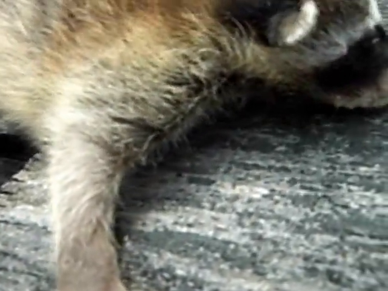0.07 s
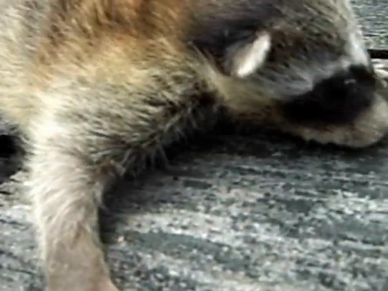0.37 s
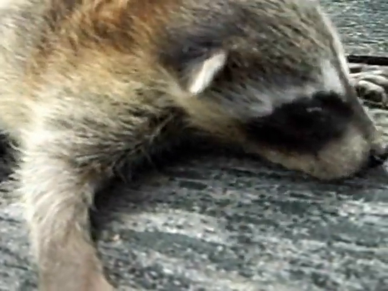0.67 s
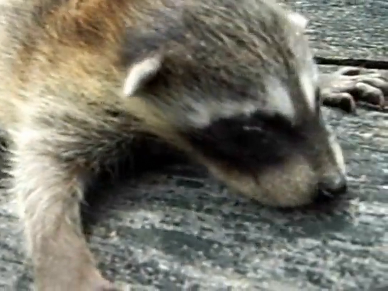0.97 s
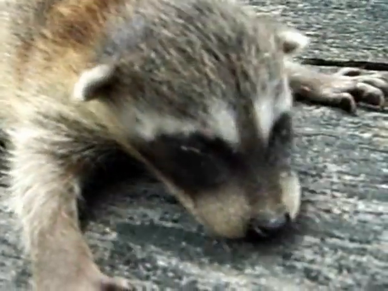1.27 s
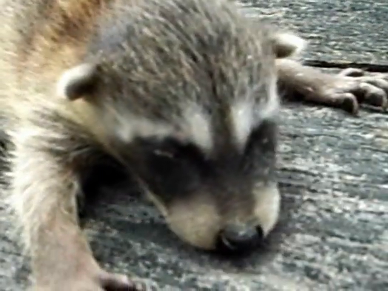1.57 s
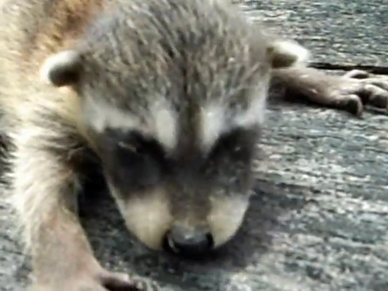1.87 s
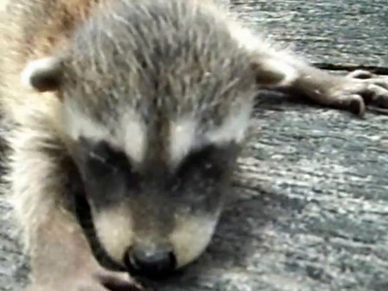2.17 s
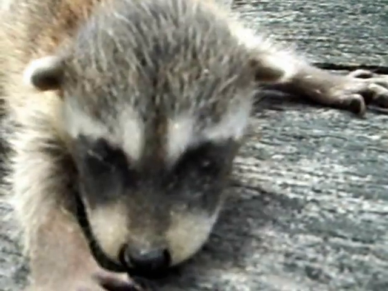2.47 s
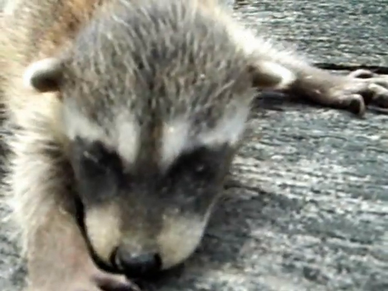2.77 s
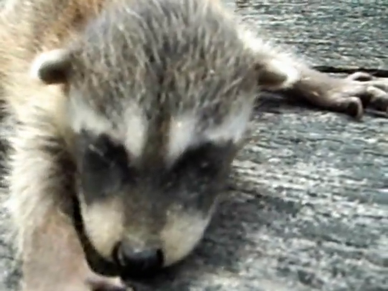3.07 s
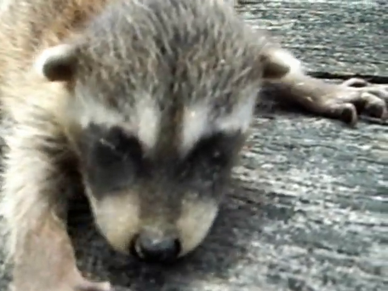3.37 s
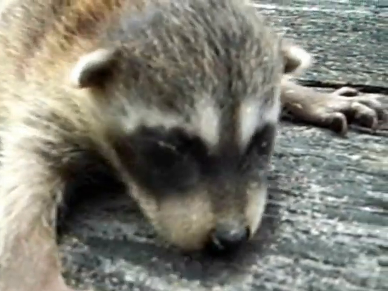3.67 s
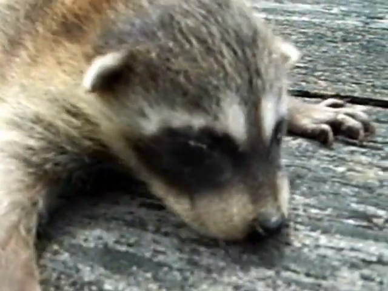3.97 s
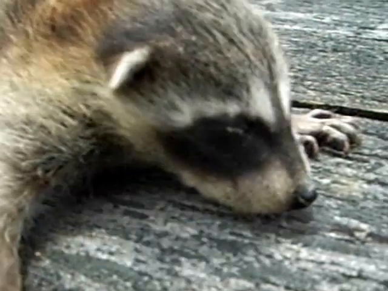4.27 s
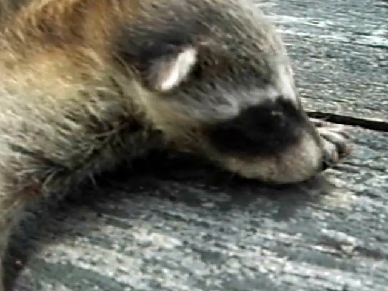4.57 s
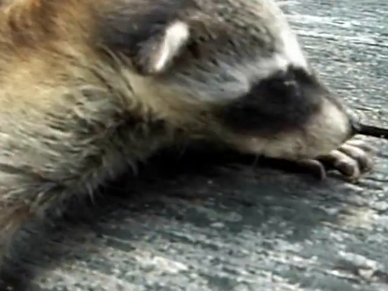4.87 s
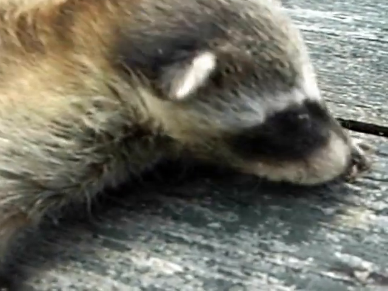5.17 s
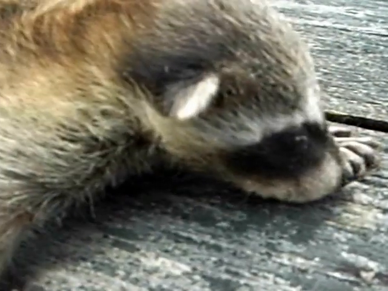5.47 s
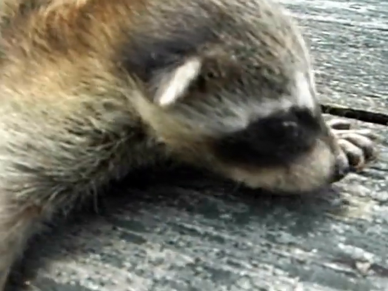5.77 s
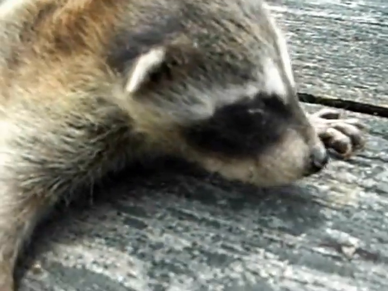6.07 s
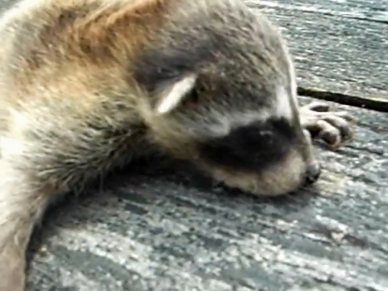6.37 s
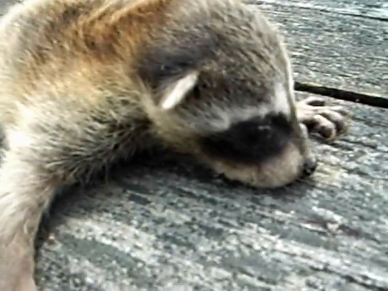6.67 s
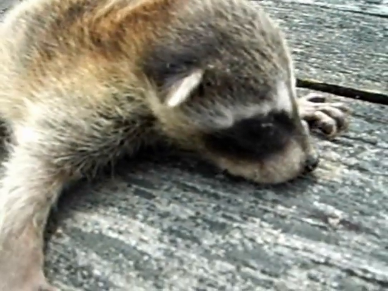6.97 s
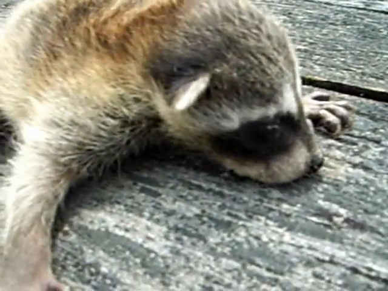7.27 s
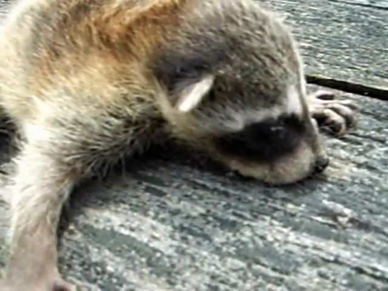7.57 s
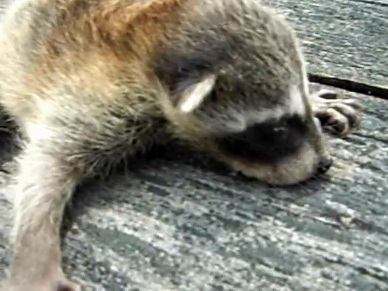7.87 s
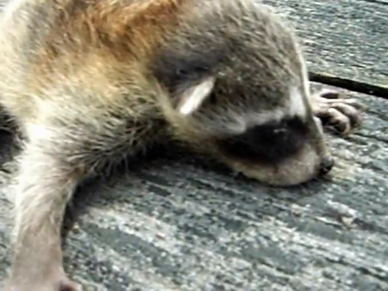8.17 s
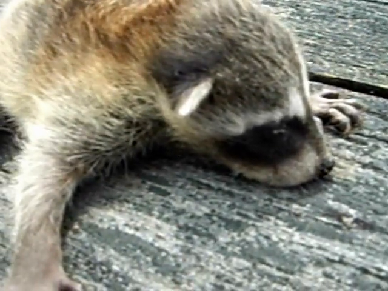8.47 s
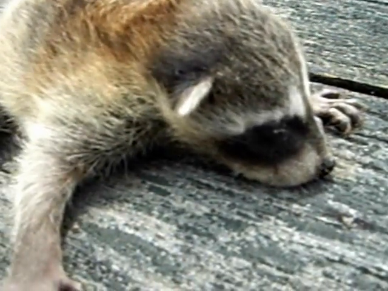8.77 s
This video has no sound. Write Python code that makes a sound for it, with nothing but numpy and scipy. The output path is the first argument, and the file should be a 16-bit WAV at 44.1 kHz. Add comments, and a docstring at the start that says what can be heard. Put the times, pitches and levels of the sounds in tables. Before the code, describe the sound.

Outdoors, distant traffic hums and rumbles quietly while a baby raccoon calls close by. It gives a short burst of raspy chitters, a couple of tiny coos and a rising whistle, then four more rapid chittering bouts, ending with the loudest. A far vehicle passes during the later bouts. The animal then falls silent, leaving the engine drone, soft tyre hiss and a very faint high whine.

```python
"""Baby raccoon chittering outdoors

A baby raccoon on wooden boards, close by, chitters in five bouts. Each chit is a short rasp of uneven
throat pulses, coloured by the opening mouth. Thin coos lead into the bouts; one rises to a whistle.
Far engines drone over a low rumble and tyre hiss, one of them passing by. A camera whines faintly."""
import sys
import numpy as np
from scipy import signal
from scipy.fft import rfft, irfft
from scipy.io import wavfile
from scipy.ndimage import uniform_filter1d

SR = 44100
rng = np.random.default_rng(int(sys.argv[2]) if len(sys.argv) > 2 else 0)


def int16_out(signal):
    """Quantize to a 16-bit WAV file."""
    q = np.round(np.clip(np.atleast_2d(signal).T, -1, 1) * 32767)
    wavfile.write(sys.argv[1], SR, q.astype(np.int16))


N = 397782
TIME_S = np.arange(N) / SR

# Far engine partials. Each row: multiple of the firing rate, offset from the swell in dB, trend in dB/s.
DRONE_PARTIALS = [(1, -7.5, -0.03), (2, 1, -0.28), (3, -5.5, 0.72), (4, -8.5, -0.4), (5, -14, 0.34),
                  (6, -17.5, -0.07)]
# Its swell on the moving air. Each row: time in seconds, level in dB.
DRONE_SWELL = [(0.0, -44.5), (2.41, -53), (2.99, -41.5), (4.7, -54.5), (5.9, -47), (9.02, -48)]
# Second far engine. Each row: time in seconds, pitch in Hz, level in dB.
ENGINE_HUM = [(0, 114.4, -55), (3, 113, -48.5), (9.02, 103.8, -66)]
# Outdoor rumble. Each row: frequency in Hz, relative density in dB.
RUMBLE_SPECTRUM = [(15, -40), (40, -1), (120, -4), (250, 4.5), (450, -6.5), (750, 0), (1100, -10.5),
                   (1900, -19.5), (2900, -32), (7000, -38), (10000, -44), (14000, -60)]
# Tyres on a far road. Each row: frequency in Hz, relative density in dB.
TYRE_SPECTRUM = [(300, -19), (1050, 4.5), (1350, -7), (1650, -4.5), (1950, -19.5), (2800, -23.5),
                 (4100, -23), (7000, -44), (14000, -77)]
# Camera whine. Each row: frequency in Hz, level in dB.
WHINE_TONES = [(7418, -68), (9868, -85)]
# Coos. Each row: start in seconds, length in seconds, mid pitch in Hz, glide in octaves/s, level in dB.
COOS = [(0.087, 0.047, 629, -4, -33), (0.16, 0.028, 666, 25, -35), (1.122, .024, 756, 6, -33.5),
        (1.482, 0.0412, 723, -7.5, -30.5), (2.302, 0.073, 758, -0.8, -34.5), (2.471, 0.025, 763, 16, -30),
        (3.139, 0.028, 716, -7.5, -34), (3.164, 0.036, 1053, 16.5, -28), (3.218, .025, 800, 10, -31.5),
        (3.283, 0.0256, 886, 13, -33), (4.174, 0.033, 705, -7.5, -32.5), (5.51, 0.04, 838, -5.5, -29.5)]
# Head response to coo and whistle overtones. Each row: frequency in Hz, gain in dB.
OVERTONE_RESPONSE = [(1300, -1.5), (2100, 12.5), (2900, -4), (3800, -5), (4500, -16), (5800, 16),
                     (6900, 4.5), (9500, 1)]
# Mouth opening, head turning. Each row: time in seconds, resonance in Hz, treble against body in dB.
MOUTH = [(.2, 950, -18.5), (.29, 1420, -9), (.48, 1050, -11.5), (1.16, 770, -37), (2.35, 820, -22),
         (2.55, 1000, -6.5), (3.28, 1140, -1.5), (3.59, 1220, -4), (4.24, 1030, -9), (4.37, 1370, -4.5),
         (5.02, 1560, -13), (5.58, 1310, -9.5), (6.05, 1800, -5)]
# Chits. Each row: peak time in seconds, level in dB, swell in seconds, release in seconds.
CHITS = [(.177, -29.5, 0.021, .005), (.214, -23, .015, 0.024), (0.288, -17, 0.03, 0.0077),
         (.344, -22, 0.029, 0.0035), (0.394, -21.5, .026, 0.0068), (.475, -26, 0.04, 0.0026),
         (1.156, -28, 0.019, 0.012), (2.326, -27.5, .023, .022), (2.366, -27.5, 0.01, .006),
         (2.424, -24.5, 0.017, .016), (2.494, -22, .025, 0.0097), (2.558, -24.5, 0.022, .008),
         (2.614, -21.5, .019, 0.0072), (2.676, -22.5, 0.028, 0.0067), (3.189, -27, .021, 0.014),
         (3.247, -21, .023, .013), (3.305, -18, .019, .013), (3.364, -20, 0.026, 0.0046),
         (3.4, -23, 0.012, 0.019), (3.472, -19.5, .017, .012), (3.585, -21, 0.022, 0.011),
         (4.246, -24.5, 0.032, 0.0068), (4.31, -22, 0.033, 0.0047), (4.365, -20.5, .028, 0.01),
         (4.417, -21, .028, .011), (4.472, -20, .025, 0.0097), (4.528, -21.5, .027, 0.0093),
         (4.594, -22.5, 0.03, 0.0076), (4.656, -24, 0.031, 0.0052), (4.713, -19.5, .029, 0.0041),
         (4.777, -19, .025, .012), (4.838, -25.5, 0.023, .015), (4.905, -22, 0.03, 0.012),
         (4.971, -18.5, 0.025, 0.0078), (5.02, -25, .016, 0.016), (5.577, -19, 0.028, .01),
         (5.633, -15, 0.021, .014), (5.679, -15, 0.025, .012), (5.726, -13.5, 0.021, .012),
         (5.779, -13.5, 0.024, 0.0097), (5.826, -12.5, .018, .013), (5.882, -16.5, .025, .008),
         (5.941, -15.5, 0.024, .013), (6.024, -17, 0.026, 0.0074), (6.107, -19, 0.027, .012)]
# Chit timbre per bout. Each row: start in seconds, nasal dip in Hz, top frequency in Hz, throat modes.
# Each mode: frequency in Hz, width in Hz, gain against the mouth resonance in dB.
BOUT_TIMBRES = [(0, 4280, 6500, [(1810, 680, -16.5), (2980, 450, -13.5), (4850, 500, -23),
                (6370, 3100, -16)]), (2.2, 1380, 5600, [(1920, 180, -5), (3540, 450, -9), (4500, 400, -18),
                (6300, 4100, -10.5)]), (3, 1436, 7060, [(1940, 560, -5), (3570, 360, -4), (4400, 1100, -16),
                (6200, 1200, -14)]), (4, 2790, 7630, [(1960, 960, -10), (3890, 440, 5), (4660, 540, -1),
                (6100, 1400, -3)]), (5.3, 2516, 8000, [(1570, 340, 0.5), (4020, 880, -3), (6400, 660, -20),
                (8150, 390, -27)])]
# Dry ticks. Each row: start in seconds, relative level in dB.
TICKS = [(.305, -24), (3.333, -22), (3.375, -24), (7.725, -46)]
# Hissy rasps around the bouts. Each row: start in seconds, length in seconds, level in dB.
RASPS = [(0.412, 0.058, -46), (.508, .032, -47.5), (0.54, .033, -46.5), (1.107, .095, -53.5),
         (1.466, .098, -52), (1.947, 0.1, -49.5), (2.294, 0.064, -46.5), (2.717, 0.065, -50),
         (3.504, 0.06, -41.5), (3.626, 0.027, -46), (4.189, 0.032, -51), (5.058, .045, -47.5),
         (5.51, 0.042, -48.5), (5.964, .048, -46), (6.157, 0.039, -44)]
# Rasp and tick noise. Each row: frequency in Hz, relative density in dB.
RASP_SPECTRUM = [(1000, 10), (2600, -3.5), (4300, 0.5), (7000, -4), (9000, -13.5), (14000, -37)]
# Whistle contour. Each row: time in seconds, pitch in Hz, level ahead of the nasal dip in dB.
WHISTLE = [(1.964, 790, -28), (1.99, 664, -31.5), (2.023, 758, -33.5), (2.052, 1105, -28),
           (2.078, 1493, -18.5), (2.092, 1525, -18), (2.112, 1831, -19), (2.143, 1897, -19.5),
           (2.16, 1780, -26)]


def from_db(db):
    return 10 ** (np.asarray(db) / 20)


def curves(rows):
    """Each column after the time column, at every sample."""
    times_s, *columns = np.transpose(rows)
    return [np.interp(TIME_S, times_s, column) for column in columns]


def add(out, start_s, x):
    i = max(int(start_s * SR), 0)
    out[i:i + len(x)] += x[:N - i]


def butter(x, hz, kind, order=4):
    return signal.sosfilt(signal.butter(order, hz, kind, fs=SR, output="sos"), x)


def resonance(x, hz, width_hz):
    """Two-pole band-pass, unity peak gain."""
    r = np.exp(-np.pi * width_hz / SR)
    feedback = [1, -2 * r * np.cos(2 * np.pi * hz / SR), r * r]
    return signal.lfilter(np.array([1, 0, -1]) * (1 - r * r) / 2, feedback, x)


def drift(rate_hz, size=N):
    """Random wander, spread about 1."""
    return np.interp(np.arange(size) * rate_hz / SR, np.arange(20000), rng.standard_normal(20000))


def shaped_noise(spectrum):
    """Steady noise, rms 1."""
    hz, db = np.transpose(spectrum)
    bins_hz = np.arange(N // 2 + 1) * SR / N
    gain = from_db(np.interp(np.log(bins_hz + 1), np.log(hz), db))
    noise = irfft(gain * rfft(rng.standard_normal(N)), N)
    return noise / np.sqrt(np.mean(noise ** 2) + 1e-20)


def tone(hz):
    """Sine on a pitch curve, rms 1."""
    return np.sqrt(2) * np.sin(2 * np.pi * np.cumsum(hz) / SR)


def far_engines(firing_hz=96, sag_hz_per_s=0.61, waver_db=1.5):
    """Two engines sink slowly in pitch and waver in the moving air."""
    hz = firing_hz - sag_hz_per_s * TIME_S
    swell_db, = curves(DRONE_SWELL)
    drone = np.zeros(N)
    for multiple, offset_db, db_per_s in DRONE_PARTIALS:
        level_db = swell_db + offset_db + db_per_s * TIME_S + waver_db * drift(4.6)
        drone += from_db(level_db) * tone(multiple * hz)
    hum_hz, hum_db = curves(ENGINE_HUM)
    return drone + from_db(hum_db + waver_db * drift(8.5)) * tone(hum_hz)


def pass_by(closest_s=5.18, time_scale_s=0.6, max_shift=0.12):
    """Straight path: nearness (1 at the closest) and Doppler factor."""
    along = (TIME_S - closest_s) / time_scale_s
    nearness = 1 / np.hypot(1, along)
    return nearness, 1 - max_shift * along * nearness


def passing_engine(firing_hz=69, firing_db=-53, whine_hz=248.7, whine_db=-40.5, waver_db=1.5):
    """Pitch drops as it passes; the whine fades with distance faster than the firing tone."""
    nearness, doppler = pass_by()
    firing = from_db(firing_db + waver_db * drift(7.4)) * tone(firing_hz * doppler)
    whine = tone(whine_hz * doppler * (1 + 0.021 * drift(40)))
    whine *= from_db(whine_db + waver_db * drift(20))
    return nearness * firing + nearness ** 2.5 * whine


def outdoors(rumble_db=-44.5, pass_rise_db=4.5, flutter_db=0.4, tyres_db=-56, tyres_db_per_s=0.88):
    """Rumble swells with the passing engine; far tyre hiss grows slowly."""
    nearness, _ = pass_by()
    rumble_gain = from_db(rumble_db + pass_rise_db * nearness - flutter_db * drift(9.2))
    tyre_gain = from_db(tyres_db + tyres_db_per_s * TIME_S)
    return rumble_gain * shaped_noise(RUMBLE_SPECTRUM) + tyre_gain * shaped_noise(TYRE_SPECTRUM)


def camera_whine():
    """Two faint, steady high tones."""
    return sum(from_db(db) * tone(np.full(N, hz)) for hz, db in WHINE_TONES)


def mouth(at_s):
    """Mouth resonance in Hz and treble gain in dB."""
    times_s, hz, treble_db = np.transpose(MOUTH)
    return np.interp(at_s, times_s, hz), np.interp(at_s, times_s, treble_db)


def clear_voice(hz, overtone_db, jitter, db_per_harmonic=-9, air_db=-44):
    """Evenly swinging vocal folds with a little air; overtones flare as they cross head resonances."""
    hz = hz * (1 + jitter * drift(500, size=len(hz)))
    head_hz, head_db = np.transpose(OVERTONE_RESPONSE)
    overtones = sum(from_db(np.interp(k * hz, head_hz, head_db) + db_per_harmonic * (k - 2))
                    * tone(k * hz) for k in range(2, 6))
    air = from_db(air_db) * butter(rng.standard_normal(len(hz)), 9000, "low") * (1 + tone(hz))
    return tone(hz) + from_db(overtone_db) * overtones + air


def coos(ref_overtone_db=-17.5, ref_mouth_hz=1065, db_per_octave=20):
    """Short gliding notes, richer in overtones as the mouth opens."""
    out = np.zeros(N)
    for start_s, length_s, pitch_hz, octaves_per_s, db in COOS:
        hz = pitch_hz * 2 ** (octaves_per_s * np.arange(-length_s / 2, length_s / 2, 1 / SR))
        mouth_hz, _ = mouth(start_s)
        overtone_db = ref_overtone_db + db_per_octave * np.log2(mouth_hz / ref_mouth_hz)
        note = clear_voice(hz, overtone_db, jitter=0.061)
        add(out, start_s, from_db(db) * signal.windows.tukey(len(hz), 0.35) * note)
    return out


def throat_pulses(size, pulse_hz=560, unevenness=0.42, spread_db=3, air_gain=0.018, puff_s=0.0038):
    """The folds slap shut at uneven moments; a turbulent puff follows each slap."""
    gaps, strengths = rng.standard_normal((2, 100))
    slaps = (np.cumsum(np.exp(unevenness * gaps)) * SR / pulse_hz).astype(int)
    inside = slaps < size
    pulses = np.zeros(size)
    pulses[slaps[inside]] = from_db(spread_db * strengths[inside])
    puffs = signal.lfilter([1], [1, -np.exp(-1 / (puff_s * SR))], pulses)
    return pulses + air_gain * (puffs + 0.5) * rng.standard_normal(size)


def upper_throat(pulses, modes, detune=0.035, spread_db=3):
    """Upper resonances; tongue and nostrils shift a little for every chit."""
    shifts = rng.standard_normal((len(modes), 2)) * [detune, spread_db]
    return sum(from_db(db + shift_db) * resonance(pulses, hz * (1 + shift), width_hz)
               for (hz, width_hz, db), (shift, shift_db) in zip(modes, shifts))


def dip_and_rolloff(x, dip_hz, top_hz, dip_depth=0.87, floor_db=-24):
    """A nasal dip hollows one band; the treble falls off steeply above a top frequency set per bout."""
    x = x - dip_depth * resonance(x, dip_hz, width_hz=400)
    return butter(x, top_hz, "low", order=8) + from_db(floor_db) * butter(x, 11000, "low")


def snout(x, decay_s=0.0008):
    """Tiny echoes in the snout smear each pulse: ragged treble."""
    echoes = 0.13 * rng.standard_normal(200) * np.exp(-TIME_S[:200] / decay_s)
    return x + signal.lfilter(echoes, [1], x)


def impose_envelope(x, envelope):
    """Even out the power over a few pulses, normalise, apply the envelope."""
    x = x / np.sqrt(uniform_filter1d(x * x, size=400) + 1e-12)
    return envelope * x / np.sqrt(np.average(x * x, weights=envelope ** 2))


def chitter(mouth_width_hz=280, chest_hz=620, chest_db=-11, split_hz=2700, flare_s=0.0056):
    """Each chit starts softly, swells as the mouth opens and snaps off; the treble flares late."""
    out = np.zeros(N)
    for peak_s, db, swell_s, release_s in CHITS:
        t = np.arange(-swell_s - 0.006, release_s + 0.0099, 1 / SR)
        stages_s = [-swell_s - 0.002, -swell_s, -flare_s, 0, 0.6 * release_s, release_s,
                    release_s + 0.0093]
        onset_db = -29.5 + 0.42 * db
        body_env = from_db(np.interp(t, stages_s, [-50, onset_db - db, -4, 0, -4.5, -17, -50]))
        treble_env = from_db(np.interp(t, stages_s, [-50, -19.5, -8, 0, -2.5, -15, -50]))
        opening = np.clip(1 + t / swell_s, 0, 1)
        mouth_hz, treble_db = mouth(peak_s)
        _, dip_hz, top_hz, modes = [bout for bout in BOUT_TIMBRES if bout[0] <= peak_s][-1]

        pulses = throat_pulses(len(t))
        voice = opening * resonance(pulses, mouth_hz, mouth_width_hz)
        voice += (1 - opening) * resonance(pulses, 0.83 * mouth_hz, mouth_width_hz)  # half open
        voice += from_db(chest_db) * resonance(pulses, chest_hz, width_hz=500)
        voice += upper_throat(pulses, modes)
        voice = dip_and_rolloff(voice, dip_hz, top_hz)

        body = butter(voice, split_hz, "low", order=7)
        body = impose_envelope(butter(body, 400, "high", order=2), body_env)
        treble = impose_envelope(snout(butter(voice, split_hz, "high", order=7)), treble_env)
        add(out, peak_s + t[0], from_db(db) * (body + from_db(treble_db) * treble))
    return out


def rasps_and_ticks(grain_db=5, grain_hz=360, tick_decay_s=0.0018):
    """Grainy voiceless hisses and a few dry ticks."""
    envelope = np.zeros(N)
    for start_s, length_s, db in RASPS:
        add(envelope, start_s, from_db(db) * signal.windows.tukey(int(length_s * SR), 0.5))
    envelope *= from_db(grain_db * drift(grain_hz))
    for start_s, db in TICKS:
        add(envelope, start_s, from_db(db) / 2 * np.exp(-TIME_S[:SR // 100] / tick_decay_s))
    return envelope * shaped_noise(RASP_SPECTRUM)


def whistle(attack_s=0.0065, release_s=0.013, dip_hz=1370):
    """A coo slides up into a whistle, thinning as it crosses the nasal dip."""
    hz, db = curves(WHISTLE)
    fade_in = (TIME_S - WHISTLE[0][0]) / attack_s
    fade_out = (WHISTLE[-1][0] - TIME_S) / release_s
    gate = np.clip(np.minimum(fade_in, fade_out), 0, 1)
    note = clear_voice(hz, overtone_db=-19.5, jitter=0.0027)
    return gate * from_db(db) * (note - resonance(note, dip_hz, width_hz=970))


def scene(board_db=-17, board_delay_s=0.000713):
    """The raccoon and its reflection off the boards, over the background; mono."""
    voice = chitter() + coos() + whistle() + rasps_and_ticks()
    reflection = from_db(board_db) * np.interp(TIME_S - board_delay_s, TIME_S, voice)
    background = far_engines() + passing_engine() + outdoors() + camera_whine()
    return (voice + reflection + background)[None]


def record(dry):
    """Steep low-pass at 14.3 kHz."""
    return signal.sosfilt(signal.ellip(10, 0.1, 80, 14300, fs=SR, output="sos"), dry)


dry = scene()
out = record(dry)
int16_out(out)
```